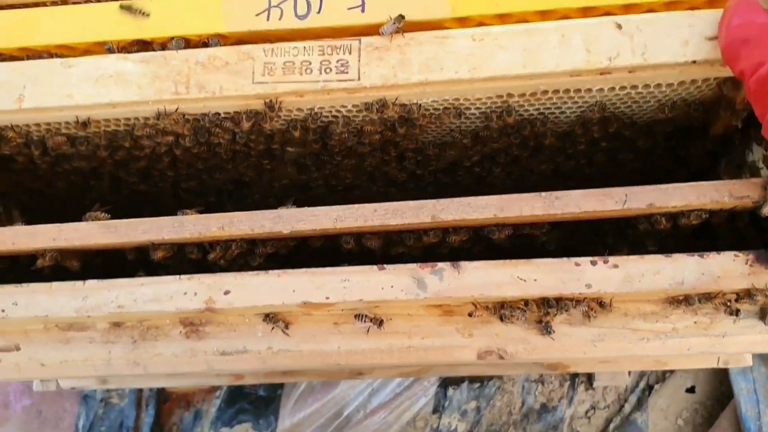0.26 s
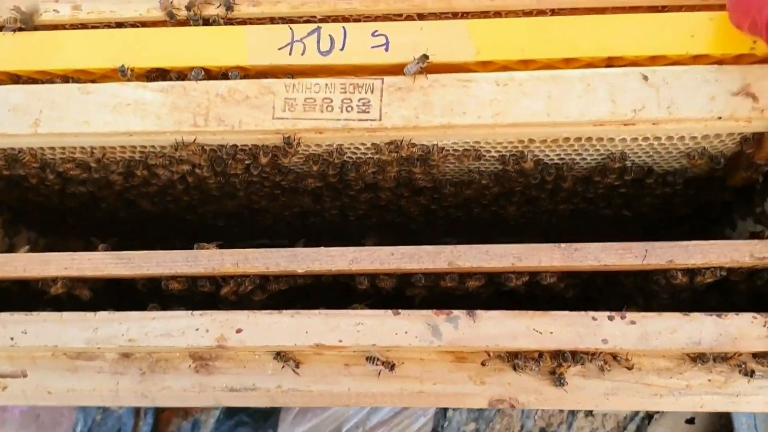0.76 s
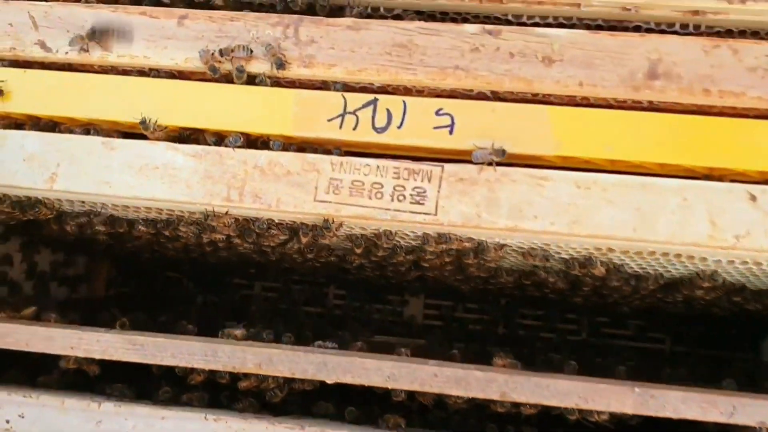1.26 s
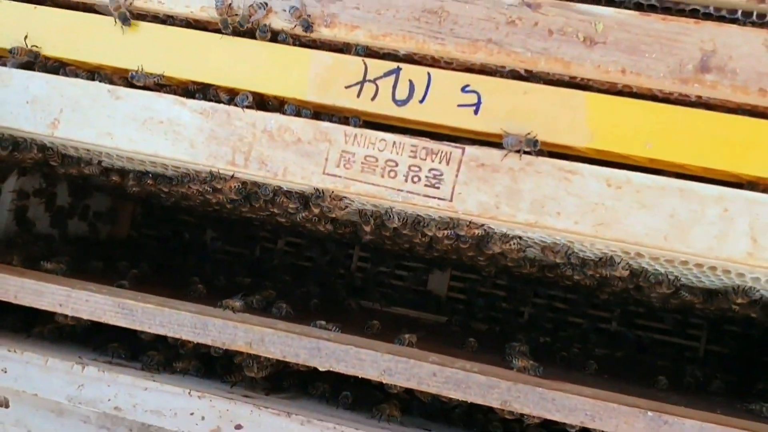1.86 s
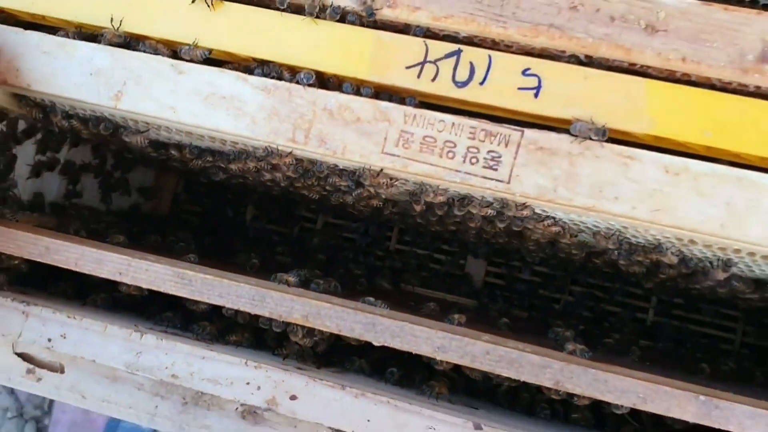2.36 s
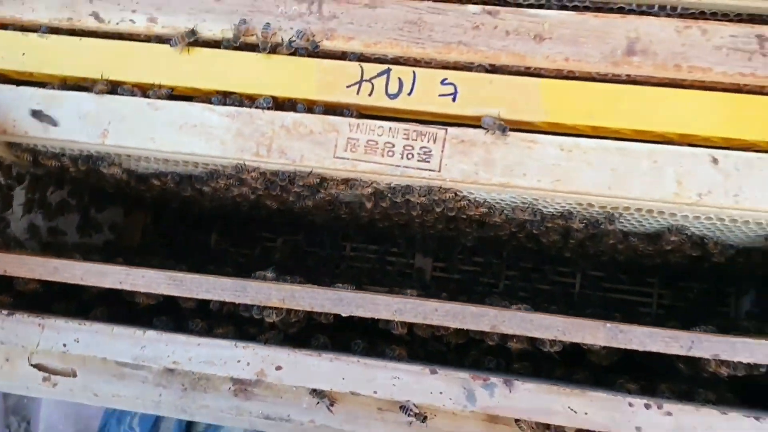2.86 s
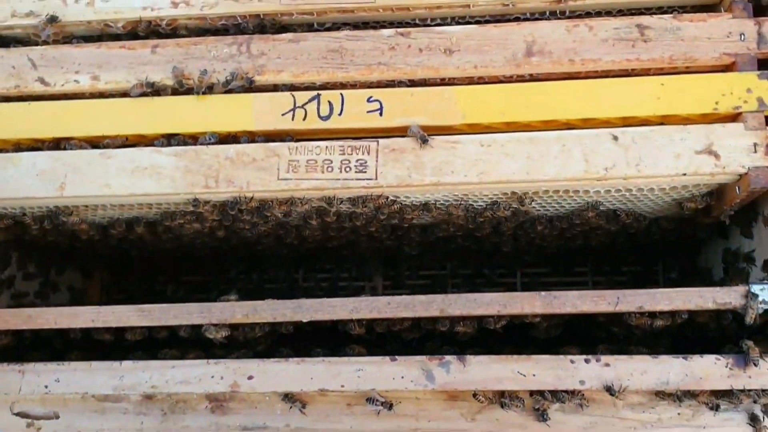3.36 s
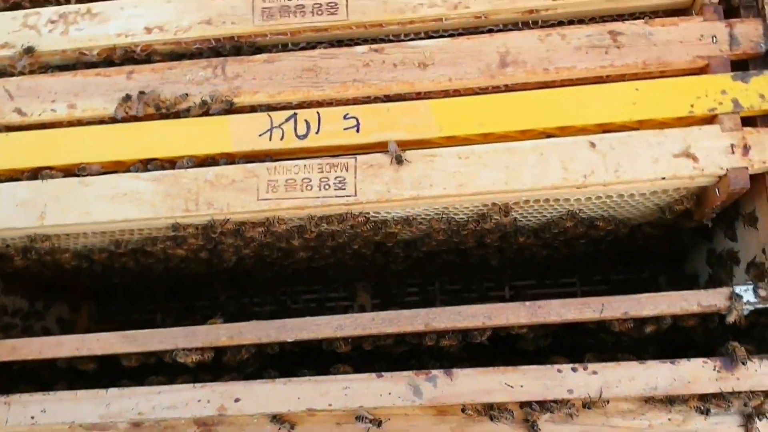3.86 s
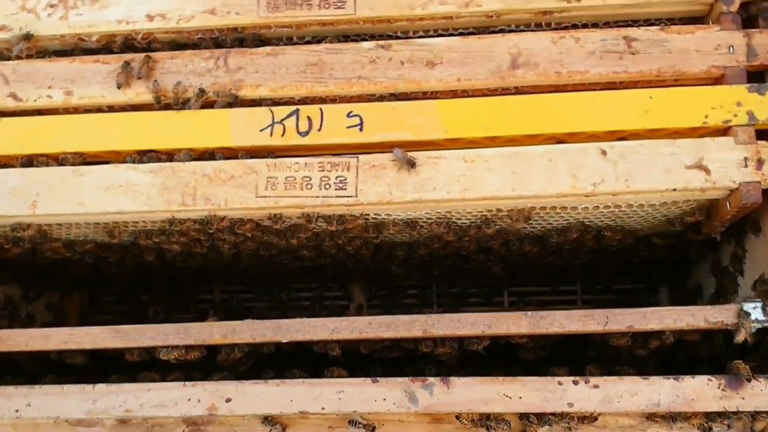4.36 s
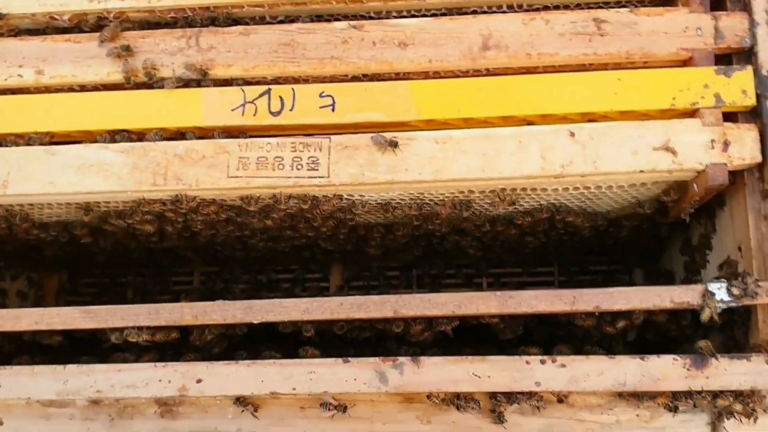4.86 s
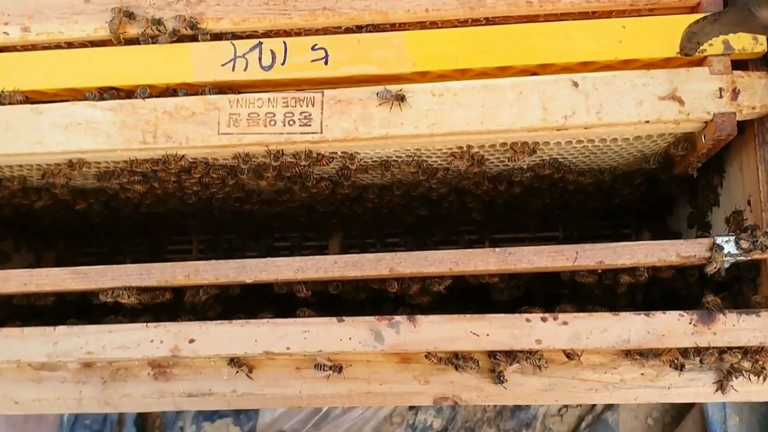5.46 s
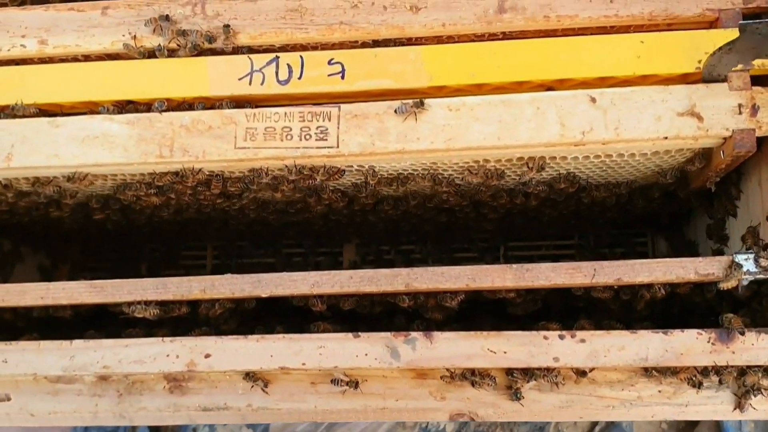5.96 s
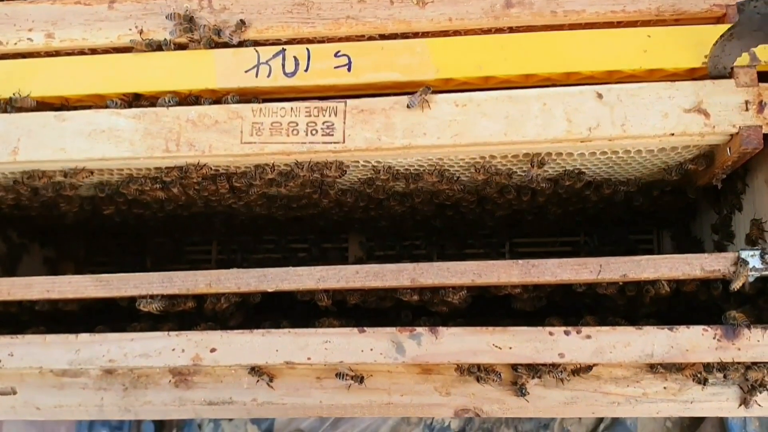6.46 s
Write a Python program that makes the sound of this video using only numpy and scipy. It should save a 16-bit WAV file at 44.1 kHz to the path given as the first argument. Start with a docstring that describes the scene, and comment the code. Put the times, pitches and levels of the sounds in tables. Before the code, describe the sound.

A bee colony hums softly close by in an open wooden hive as gloved hands rustle, frames knock dully, and a stuck frame finally cracks loose.

```python
"""A honeybee colony hums close by in an open wooden hive: many wings beat at their own wandering pitches
over a fine hiss, while the keeper's hands rustle as noisy strokes and faint gliding chirps come from afar.
Soon a frame is pushed along the rim; frames bump dully against the box, ringing its damped modes.
Dry scuffs come and go, small snaps follow, and the fidgeting hands come to rest but for two last strokes.
At the end a stuck frame is pried and shifts with grinding noise, ringing wood and a sharp crack."""
import sys
import numpy as np
from scipy import signal
from scipy.fft import rfft, irfft
from scipy.io import wavfile

SR = 44100
rng = np.random.default_rng(int(sys.argv[2]) if len(sys.argv) > 2 else 0)


def to_wav(sig):
    """Store sig (one row per channel, or 1-D mono) as 16-bit WAV at the path in sys.argv[1].

    Samples outside -1..1 are clipped; the rate is SR.
    """
    pcm = np.clip(np.atleast_2d(sig), -1, 1) * 32767
    pcm = np.round(pcm).astype(np.int16)
    wavfile.write(sys.argv[1], SR, pcm.T)  # frames by channels


N = 295932
TIME = np.arange(N) / SR
HZ = np.fft.rfftfreq(N, 1 / SR)


# groups of bees: (wingbeat [Hz], half-spread between bees [share of pitch], relative level [dB],
# overtone slope [dB per octave])
BEE_GROUPS = [(133.95, .13, -1.5, -1), (262, .16, -6.5, -5)]
# colour of the gaps between the combs: (frequency [Hz], relative level [dB])
COMB_GAPS = [(80, -5), (138, 0.5), (190, -3), (255, -2.5), (315, 6.5), (360, 4), (400, 4.5), (475, -0.5),
             (530, -2), (580, -18), (800, -8), (1300, -11.5), (2500, -12.5), (5000, -30)]
HUM_DB = -49


def hum(count=10, wander=.065, flutter=.018, swell_db=6, surge_db=1.3, scatter=.4):
    """Each bee beats at its own wandering pitch and swells; each group surges; comb gaps colour the sum."""
    pair = np.zeros((2, N))
    cycle = np.linspace(0, 1, 513)
    k = np.arange(1, 17)[:, None]
    for wing_hz, spread, db, fall_db in BEE_GROUPS:
        surge = amp(db + surge_db * drift(rate_hz=6.7))
        for i, place in enumerate(np.linspace(-1, 1, count)):
            # the overtones stay loosely in step, so each wingbeat is a soft pulse
            phase = 2 * np.pi * (k * cycle + scatter * rng.random(k.shape))
            beat = (amp(fall_db * np.log2(k)) * np.cos(phase)).sum(0)
            hz = wing_hz * np.exp(spread * place + wander * drift(rate_hz=2.5) + flutter * drift(rate_hz=14.02))
            bee = np.interp(np.cumsum(hz) / SR % 1, cycle, beat)
            swell = unit(amp(swell_db * np.tanh(drift(rate_hz=3.1))))
            # alternating sign in the second channel: in the middle, or off to the sides
            pair += surge * bee * swell * np.array([[1], [(-1) ** i]])
    return amp(HUM_DB) * unit(ports(tint(pair, COMB_GAPS)))


# one bee fans without pause: (time [s], wingbeat [Hz])
STEADY_PITCH = [(0, 266), (.35, 261), (.65, 262), (.98, 255), (1.15, 267), (1.4, 257), (2.6, 265),
                (2.95, 252), (3.4, 253), (3.95, 265), (4.1, 249), (4.33, 272), (4.6, 268), (5.0, 253),
                (5.4, 248), (5.76, 272), (6.2, 252), (6.7, 266)]
# the first harmonics of its wingbeat, from the fundamental up: level [dB]
STEADY_HARMONICS = [-63, -61.5, -73.5]


def steady_bee(wander=0.02195, swell_db=6.5):
    """One steadily fanning bee draws a thin wavering line; each harmonic swells on its own."""
    hz = np.interp(TIME, *np.transpose(STEADY_PITCH)) * np.exp(wander * drift(rate_hz=9.08))
    turns = np.cumsum(hz) / SR
    out = np.zeros(N)
    for k, db in enumerate(STEADY_HARMONICS, 1):
        swell = amp(swell_db * np.tanh(drift(rate_hz=10)))
        out += amp(db) * unit(swell * np.sin(2 * np.pi * k * turns))
    return out


# moments when single wingbeat tones stand out of the hum: (time of the peak [s], length [s],
# wingbeat [Hz], level [dB], wander [share of pitch])
HUM_STRANDS = [(0.66, 0.38, 262.8, -58, 0.022), (1.003, 0.3, 255, -53, 0.023),
               (1.24, 0.58, 143, -52, 0.041), (1.626, 0.28, 135.7, -51, 0.035),
               (2.045, .16, 139.8, -50.5, .03), (4.034, 0.083, 315, -51, .03),
               (4.33, 0.23, 147.2, -53.5, 0.041), (4.386, 0.13, 271, -58, 0.0209),
               (4.9, 0.32, 137, -54, 0.042), (4.875, 0.12, 296, -51, .03), (5.19, 0.11, 130, -53, 0.043),
               (5.213, .12, 307, -50, 0.028), (5.514, .14, 313, -50.5, 0.0304),
               (5.647, 0.15, 134, -56, .04), (5.78, .14, 298, -55, 0.032), (5.827, 0.28, 262, -61, 0.022),
               (6.073, .22, 144, -57, 0.033), (6.255, 0.15, 254.6, -53, 0.021),
               (6.365, 0.11, 138, -52, 0.031)]


def hum_strands(fall_db=-9, count=4):
    """Wavering harmonic wingbeat tones swell out of the hum and fade, coloured by the comb gaps."""
    out = np.zeros(N)
    for s, length, hz, db, wander in HUM_STRANDS:
        turns = np.cumsum(hz * np.exp(wander * drift(rate_hz=4.85))) / SR
        wings = sum(amp(fall_db * np.log2(k)) * np.sin(2 * np.pi * k * turns) for k in range(1, count + 1))
        out += stroke(s, length, db) * unit(tint(wings, COMB_GAPS))
    return out


# ringing modes of the hive box with its frames: (frequency [Hz], relative level [dB], t60 [s])
BOX_MODES = [(89, -6.5, 0.08), (138, -9, 0.034), (235, -19, 0.038), (289.6, -6.5, 0.074), (364, -8, 0.043),
             (469.7, 2, 0.05), (516.5, -7.5, 0.083), (670, 2, 0.026), (857, -0.5, 0.014),
             (1178, -10.5, 0.04), (1295, -4, 0.022), (1360, -14, 0.036), (1555, -11.5, 0.043),
             (1660, -10.2, 0.025), (1900, -17, 0.046), (2391, -16, 0.029), (2450, -17, 0.028)]
# bumps on the box: (time [s], level [dB], hardness as a corner [Hz], push on the floor mode [dB],
# push on the wall modes [dB], modes with a node at the struck spot [Hz], damping by the hand [dB per s])
BOX_BUMPS = [(1.7244, -25.5, 930, 8, 2, 615, 40), (1.7677, -39.5, 460, 5, 14, 1080, 80),
             (1.8035, -23, 410, 5, -1, 1210, 120), (1.8209, -29.5, 370, 11.5, 3, 1210, 180),
             (1.831, -30.5, 870, -2, 7, 730, 120), (1.8626, -18, 530, 2.5, 2.5, 710, 260),
             (1.874, -25, 348, 3, 5, 1210, 490), (1.896, -39, 870, -2, 6, 660, 0),
             (1.9315, -26.5, 180, 8.5, 16, 670, 800), (1.9439, -30, 220, 14, 11, 730, 600),
             (2.0945, -23, 348, -4, 6, 930, 300), (2.2688, -11.5, 1380, -1.5, -7.5, 670, 40),
             (2.286, -29.5, 1620, 2, 0, 755, 210), (2.3138, -29, 330, -14, 5, 1080, 0),
             (2.429, -15, 1890, -3, 0, 320, 40), (2.4346, -26, 1240, -0.5, 0, 340, 850)]


def bumps(node_depth=0.86, node_width=0.27, floor_hz=110, wall_hz=330, crumb_db=-15, crumb_t60=0.015):
    """Soft contact favours the low modes; modes with a node there stay quiet; the hand damps the ring."""
    out = np.zeros(N)
    hz = np.array(BOX_MODES)[:, :1]
    t = TIME[:SR // 2]
    for s, db, hard_hz, floor_db, wall_db, node_hz, damp_db_per_s in BOX_BUMPS:
        spot = 1 - node_depth * np.exp(-(np.log(hz / node_hz) / node_width) ** 2)
        push = amp(np.select([hz < floor_hz, hz < wall_hz], [floor_db, wall_db]))
        damped = ring(BOX_MODES, spot * push, contact_s=0.00054) * amp(-damp_db_per_s * t)
        wood = soften(damped, hard_hz, order=3)
        # dry wax crumbles under the blow
        crumbs = soften(rng.standard_normal(len(t)), 1.5 * hard_hz, order=4)
        crumbs *= amp(crumb_db - 60 * t / crumb_t60)
        add(out, s, amp(db) * (wood + crumbs))
    return rattle(radiate(out, lowest_hz=70), wet_db=-11.0, t60=0.092)


# ringing modes of the pried frame: (frequency [Hz], relative level [dB], t60 [s])
FRAME_MODES = [(111, -7.5, 0.11), (169, -25, 0.16), (220, -25, 0.065), (332, -9, 0.072), (403, -3, 0.037),
               (453, -7.5, 0.046), (512, -7, 0.046), (680, -2, 0.04), (800, -33, 0.027), (1200, -13, 0.049),
               (1570, -13, 0.041), (1760, -11, 0.031), (2500, -24, 0.073), (4250, -19, 0.058)]
# its slips: (time [s], ring level [dB], crack level [dB], crack t60 [s], weight on the low modes [dB])
FRAME_SLIPS = [(6.5275, -36, -37, 0.046, -6), (6.547, -22, -20.5, 0.031, -6),
               (6.5531, -16.5, -9.5, 0.014, -6), (6.5554, -12, -21, 0.027, -9), (6.564, -37, -26, 0.06, 3),
               (6.5646, -26, -27.5, 0.052, 9)]
# wax and wood grind as it starts, gives way and settles: (time of the peak [s], length [s], level [dB])
FRAME_GRINDS = [(6.533, 0.018, -36), (6.562, 0.031, -22.5), (6.588, 0.033, -38.5)]
# colour of the crack and the grinding: (frequency [Hz], relative level [dB per Hz])
CRACK_COLOUR = [(30, -24), (100, 8), (300, 7), (700, 7.5), (1100, 2), (2000, 3), (3200, 0), (4300, 0.5),
                (6000, -0.5), (7600, -0.5), (9000, -11.5), (12000, -7.5), (15800, -7)]


def pried_frame(low_hz=300):
    """A stuck frame grinds, lets go in a few cracking slips and drops back with its weight, on the right."""
    wood, burst = np.zeros(N), np.zeros(N)
    t = TIME[:SR // 4]
    low = np.array(FRAME_MODES)[:, :1] < low_hz
    for s, ring_db, crack_db, t60, weight_db in FRAME_SLIPS:
        add(wood, s, amp(ring_db) * ring(FRAME_MODES, amp(weight_db * low)))
        add(burst, s, amp(crack_db - 60 * t / t60))
    grind = strokes(FRAME_GRINDS) * grains(per_s=2100, spread_db=2.0, share=0.19)
    crunch = tint(grind + burst * rng.standard_normal((2, N)), CRACK_COLOUR)
    body = rattle(soften(wood, corner_hz=2420), wet_db=-19, t60=0.099) * amp([[-.5], [.5]])
    return radiate(body + from_right(crunch, lag_s=0.000297, direct=0.33, right_db=4.0), lowest_hz=88)


# a frame is pushed along the rim of the box: (time of the peak [s], length [s], level [dB])
RIM_DRAGS = [(1.19, 0.43, -48.5), (1.775, 0.1, -48), (1.835, 0.06, -43), (1.91, 0.098, -44),
             (2.29, 0.21, -42), (2.59, 0.03, -44.5), (2.662, 0.078, -46), (2.711, .04, -43)]
# colour of wax crackling under it: (frequency [Hz], relative level [dB per Hz])
WAX_COLOUR = [(400, 7), (1000, 9.5), (1900, 7.5), (3000, -17), (5000, -15), (9000, -23)]


def dragging(rasp_db=-6.0):
    """Stick and slip keeps the low modes of the box rumbling, and dry wax crackles under the frame."""
    slips = soften(grains(per_s=250, spread_db=0.0, share=0.98), corner_hz=420)
    rumble = signal.fftconvolve(slips, ring(BOX_MODES)[None], axes=1)[:, :N]
    body = radiate(rumble, lowest_hz=75)
    crackle = tint(grains(per_s=430, spread_db=1.5, share=0.83), WAX_COLOUR)
    both = unit(ports(body, right_db=2.5)) + amp(rasp_db) * ports(crackle, right_db=-7.0)
    return strokes(RIM_DRAGS) * both


# strokes of gloves and sleeves: (time of the peak [s], length [s], level at the pivot [dB],
# brightness [dB per octave], right minus left [dB])
HAND_STROKES = [(.262, 0.071, -48, 2, 0), (0.3, 0.044, -51, 2, -3), (.78, 0.16, -52, 2.5, 1),
                (0.996, 0.15, -46.5, 0.8, 2), (1.09, 0.15, -49.5, 0.5, 5), (1.178, 0.14, -44, 0.3, 6),
                (1.286, 0.47, -48.5, 1, 2), (1.61, 0.16, -52, 0, 0), (1.843, 0.27, -48, 0, 2),
                (1.919, 0.083, -45, -0.5, 1), (2.083, 0.086, -49.5, -1.5, -1),
                (2.272, 0.16, -41.5, 0.5, 1.5), (2.434, 0.054, -40.5, -4, 0), (2.507, 0.12, -51.5, -3, 1),
                (2.605, 0.08, -49, -1, 2), (2.663, 0.06, -48, -1, 2), (2.706, 0.11, -42.5, -0.2, -0.5),
                (2.89, 0.099, -48, -2, 0.5), (3.0, 0.11, -52.5, -2.5, 0), (3.106, 0.11, -46.5, -0.5, 4.5),
                (3.25, 0.17, -48, 0, 2.5), (3.564, .14, -54.5, .5, 4), (3.664, 0.12, -45, -.5, 3),
                (3.945, 0.12, -53.5, -3, 4), (4.077, 0.051, -45, 0, 2), (4.252, 0.12, -51, -1.2, 5),
                (4.523, 0.14, -49, 0.5, 3), (4.641, 0.1, -40.5, 0.4, 7), (4.89, 0.71, -56.5, -1.5, 4),
                (5.08, 0.096, -54, -2, 10), (6.158, 0.2, -55, 4, 1), (6.702, 0.11, -46, 1.5, 0)]
# colour of cloth and rubber: (frequency [Hz], relative level [dB per Hz])
CLOTH_COLOUR = [(40, 5.5), (250, -25), (700, 8.5), (1200, 3.5), (2100, 6.5), (3200, 2.5), (5000, 1),
                (7500, 2), (9000, -7), (12000, 0), (15800, -2)]


def rubbing(patchy_db=2.0, pivot_hz=4000, count=11):
    """Cloth and rubber slide in grainy strokes; the bands flicker apart as they catch and let go."""
    cloth = tint(grains(per_s=800, spread_db=2.0, share=0.12), CLOTH_COLOUR)
    cloth = rfft(from_right(cloth, lag_s=0.000449, direct=0.11, right_db=0))
    # overlapping triangular bands on a log-frequency axis
    centres = np.geomspace(500, 16000, count)
    band = np.interp(np.log(HZ + 1), np.log(centres), np.arange(count))
    power = np.array([stroke(*row[:3]) ** 2 for row in HAND_STROKES])
    tilt_db, right_db = np.transpose(HAND_STROKES)[3:]
    restless = fidget() ** 2
    out = np.zeros((2, N))
    for i, hz in enumerate(centres):
        weight = amp(tilt_db * np.log2(hz / pivot_hz) + np.outer([-.5, .5], right_db)) ** 2
        catch = unit(amp(patchy_db * drift(rate_hz=43)))
        strip = irfft(cloth * np.maximum(1 - abs(band - i), 0), N)
        out += strip * catch * np.sqrt(weight @ power + restless)
    return out


# the hands fidget faintly between strokes, fading until they rest
FIDGET_DB, FIDGET_SWING_DB, REST_S, SETTLE_S = -59.5, 1, 5.8, 0.36


def fidget():
    """Gain of the small restless movements of the hands."""
    busy = np.clip((REST_S - TIME) / SETTLE_S, 0, 1)
    return busy * amp(FIDGET_DB + FIDGET_SWING_DB * drift(rate_hz=43))


# short scuffs of wax and wood: (time [s], length [s], centre [Hz], level before judder and panning [dB])
WOOD_SCUFFS = [(0.233, 0.096, 920, -58), (1.571, 0.059, 1565, -61), (2.358, .05, 1880, -57),
               (2.644, .04, 3050, -62), (2.649, 0.027, 3900, -56), (2.673, 0.028, 2220, -52),
               (2.702, 0.04, 3850, -55), (2.709, .032, 2200, -51), (2.739, 0.1, 952, -55),
               (2.79, 0.12, 849, -64), (3.726, 0.091, 2460, -58.5), (4.312, 0.12, 3700, -61)]


def scuffs(width=0.11, judder_db=4):
    """Brief juddering scrapes, each a narrow noise band around one pitch of the wood."""
    out = np.zeros((2, N))
    for s, length, hz, db in WOOD_SCUFFS:
        t = TIME[:round(length * SR)]
        rasp = soften(rng.standard_normal((2, SR // 2)), width * hz)[:, -len(t):]
        scrape = rasp * np.sin(2 * np.pi * hz * t) * np.sin(np.pi * t / length)
        add(out, s, amp(db) * unit(scrape))
    judder = unit(amp(judder_db * drift(rate_hz=94)))
    return from_right(out * judder, lag_s=.0001, direct=0.72, right_db=4.0)


# snaps of wax and resin: (time [s], level [dB], note [Hz], crack relative to the note [dB],
# right minus left [dB])
WAX_SNAPS = [(1.9172, -40, 2160, -8, 3), (2.0806, -33.5, 1320, -13, -6), (2.089, -38, 1330, -10, -2),
             (3.6135, -42, 2120, 2, 7), (3.947, -48, 1790, -8, 0), (4.654, -35.5, 1690, -6, 7),
             (4.933, -45, 1750, -7, 2), (5.7058, -45, 1800, -13, 10), (6.169, -54, 2010, 17, 0)]


def snaps(ring_t60=0.013, crack_t60=0.016):
    """Bits of wax and resin snap: a tiny noise crack and one short note of the wood."""
    out = np.zeros((2, N))
    t = TIME[:SR // 10]
    for s, db, hz, crack_db, right_db in WAX_SNAPS:
        note = np.sin(2 * np.pi * hz * t) * amp(-60 * t / ring_t60)
        crack = soften(rng.standard_normal((2, len(t))), corner_hz=6000, order=1)
        crack *= amp(crack_db - 60 * t / crack_t60)
        add(out, s, (note + crack) * amp(db + right_db * np.array([[-.5], [.5]])))
    return out


def fine_grain(level_db=-62.5, low_hz=1300, high_hz=6500, grain_s=0.013, spread_db=3.2, count=2000):
    """Fine grain of the hiss: countless tiny tonal grains, each with its own pitch, size and side."""
    out = np.zeros((2, N))
    for when, pitch, size, span, side, turn in rng.random((count, 6)):
        t = TIME[:round(grain_s * (.5 + span) * SR)]
        hz = low_hz * (high_hz / low_hz) ** pitch
        # quick rise, slower fall
        shape = np.sin(np.pi * np.sqrt(t / t[-1])) ** 2 * amp(-spread_db * np.log(max(size, .03)))
        tone = np.sin(2 * np.pi * (hz * t + np.array([[0], [turn]])))
        add(out, when * TIME[-1], shape * np.sqrt([[1 - side], [side]]) * tone)
    return amp(level_db) * unit(out)


# steady background hiss: (frequency [Hz], relative level [dB per Hz])
HISS_COLOUR = [(20, 3), (45, 10.5), (80, 13.5), (200, 15), (600, 9), (1350, -6.5), (1900, -0.5),
               (3000, -1.5), (4800, -3), (7600, 1), (8500, -7), (9400, -8), (12000, 0), (15800, 1)]
HISS_DB = -50


def hiss():
    """An even, finely grained hiss, probably microphone noise along with the colony."""
    fizz = tint(grains(per_s=900, spread_db=2.5, share=0.18), HISS_COLOUR)
    return amp(HISS_DB) * ports(fizz, right_db=1.5)


# far chirps: (time [s], length [s], pitch [Hz], level [dB], glide [share of pitch])
FAR_CHIRPS = [(0.27, 0.15, 7130, -61, -0.02), (0.93, 0.13, 7370, -56, 0.049),
              (1.985, 0.065, 7300, -57, -0.026), (2.045, 0.073, 7100, -61, -0.019),
              (2.968, 0.13, 7300, -60.5, .08), (4.004, 0.23, 7300, -59, 0.013),
              (4.79, 0.12, 7650, -60.5, 0.033), (5.815, 0.076, 7000, -59, 0.04),
              (5.86, 0.096, 7550, -63, -0.02), (5.9, 0.12, 6940, -60.5, -0.02),
              (5.985, 0.04, 6400, -62, -.1)]


def chirps(width_hz=130, arch=0.024):
    """Thin gliding, arching notes, blurred by distance into narrow bands of noise."""
    out = np.zeros((2, N))
    for s, length, hz, db, glide in FAR_CHIRPS:
        u = np.linspace(0, 1, round(length * SR))
        bend = glide * (u - .5) + arch * (np.sin(np.pi * u) - 2 / np.pi)
        turns = np.cumsum(hz * (1 + bend)) / SR
        blur = soften(rng.standard_normal((2, SR // 2)), width_hz)[:, -len(u):]
        add(out, s, amp(db) * unit(blur * np.sin(2 * np.pi * turns) * np.sin(np.pi * u)))
    return out


# every swell: share of its length spent rising, level at its ends [dB],
# roundness of its top (1 = pointed, 2 = a dome)
SWELL_SHARE, ENDS_DB, ROUNDNESS = 0.6, -9, 1.29


def stroke(peak_s, length, db):
    """Gain of one movement or tone: it swells to a peak and falls as it lets go."""
    before, after = (peak_s - TIME) / SWELL_SHARE, (TIME - peak_s) / (1 - SWELL_SHARE)
    away = np.maximum(before, after) / length
    return amp(db + ENDS_DB * away ** ROUNDNESS)


def strokes(rows):
    """Overlapping strokes add in power."""
    return np.sqrt(sum(stroke(*row) ** 2 for row in rows))


def ring(modes, gains=1, contact_s=0.00055):
    """The dying modes of struck wood, kicked into motion together during a brief contact."""
    hz, db, t60 = np.transpose(modes)[:, :, None]
    t = TIME[:SR // 2]
    partials = gains * amp(db - 60 * t / t60) * np.cos(2 * np.pi * hz * t)
    return (1 - np.exp(-t / contact_s)) * partials.sum(0)


def rattle(x, wet_db, t60):
    """Dense short echoes between the combs and walls, different at each port."""
    t = TIME[:SR // 4]
    tail = rng.standard_normal((2, len(t))) * amp(-60 * t / t60) * (1 - np.exp(-t / 0.0073))
    tail /= np.linalg.norm(tail, axis=1, keepdims=True)
    echoes = ports(signal.fftconvolve(x[None], tail, axes=1)[:, :N])
    return x + amp(wet_db) * echoes


def grains(per_s, spread_db, share):
    """Two channels of smooth noise mixed with tiny ticks of uneven size; share is the ticks' power."""
    size = amp(spread_db * np.minimum(rng.exponential(1, (2, N)), 4))
    ticks = (rng.random((2, N)) < per_s / SR) * rng.standard_normal((2, N)) * size
    return np.sqrt(share) * unit(ticks) + np.sqrt(1 - share) * rng.standard_normal((2, N))


# how alike the two channels of a diffuse sound are: (frequency [Hz], left-right likeness [0 to 1])
PORT_LIKENESS = [(20, 0.35), (70, 1), (130, 0.93), (350, 0.96), (640, 0.42), (1400, 0), (3000, 0)]


def ports(pair, right_db=0):
    """Two microphone ports share most of a diffuse sound's bass but not its treble."""
    a, b = rfft(pair)
    same = read(PORT_LIKENESS, HZ)
    right = same * a + np.sqrt(1 - same ** 2) * b
    return irfft(np.array([a, right]), N) * amp([[-right_db / 2], [right_db / 2]])


def from_right(pair, lag_s, direct, right_db):
    """The left port hears the sound late; likeness never falls below the direct share."""
    a, b = rfft(pair)
    same = np.maximum(read(PORT_LIKENESS, HZ), direct)
    left = (same * a + np.sqrt(1 - same ** 2) * b) * np.exp(-2j * np.pi * HZ * lag_s)
    return irfft(np.array([left, a]), N) * amp([[-right_db / 2], [right_db / 2]])


def radiate(x, lowest_hz):
    """High-pass: small wooden parts give off no deep bass."""
    return signal.sosfilt(signal.butter(3, lowest_hz, "high", fs=SR, output="sos"), x)


def soften(x, corner_hz, order=2):
    """Low-pass."""
    return signal.sosfilt(signal.butter(order, corner_hz, fs=SR, output="sos"), x)


def drift(rate_hz):
    """Smooth random wandering of rms 1."""
    slow_hz = np.fft.rfftfreq(2048, TIME[-1] / 2048)
    slow = irfft(rfft(rng.standard_normal(2048)) / (1 + (slow_hz / rate_hz) ** 2))
    return np.interp(TIME, np.linspace(0, TIME[-1], len(slow)), unit(slow))


def tint(x, spectrum):
    """Colours a sound by a spectrum table; white noise keeps its power."""
    return irfft(rfft(x) * unit(amp(read(spectrum, HZ))), N)


def read(points, hz):
    """Reads a spectrum table on a log-frequency axis."""
    f, value = np.transpose(points)
    return np.interp(np.log(hz + 1), np.log(f + 1), value)


def amp(db):
    """Decibels to gain."""
    return 10 ** (np.asarray(db) / 20)


def unit(x):
    """Scales to rms 1."""
    return x / np.sqrt(np.mean(x ** 2) + 1e-20)


def add(mix, s, sound):
    """Lays a sound into the mix at a time in seconds."""
    part = mix[..., round(s * SR):][..., :sound.shape[-1]]
    part += sound[..., :part.shape[-1]]


def scene():
    """The colony, the wood, the hands and the background together."""
    colony = hum() + steady_bee() + hum_strands()
    wood = bumps() + pried_frame() + dragging()
    hands = rubbing() + scuffs() + snaps()
    return colony + wood + hands + fine_grain() + hiss() + chirps()


def record(dry):
    """Band limit: a steep low-pass at the top of the treble."""
    lowpass = signal.firwin(511, 15900, window=("kaiser", 9), fs=SR)  # corner in Hz
    return signal.oaconvolve(dry, lowpass[None], "same")


dry = scene()
out = record(dry)
to_wav(out)
```